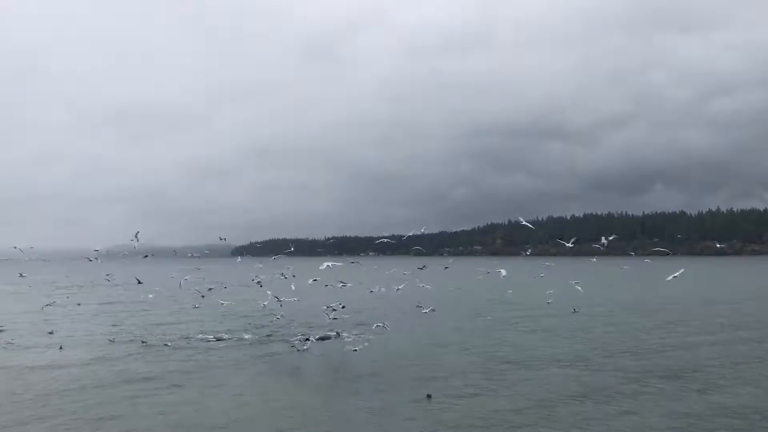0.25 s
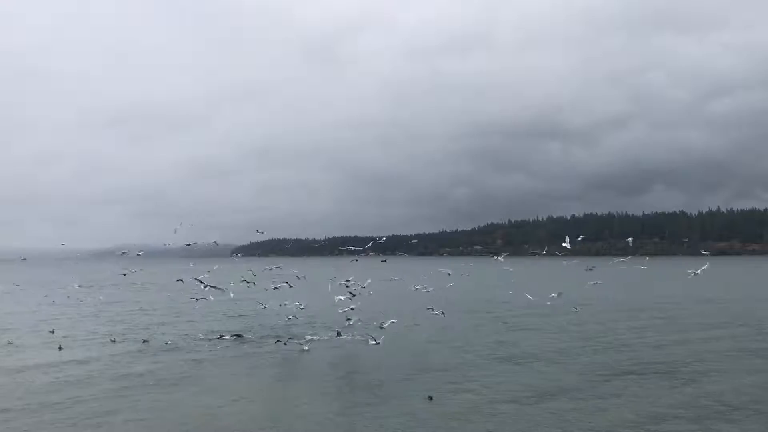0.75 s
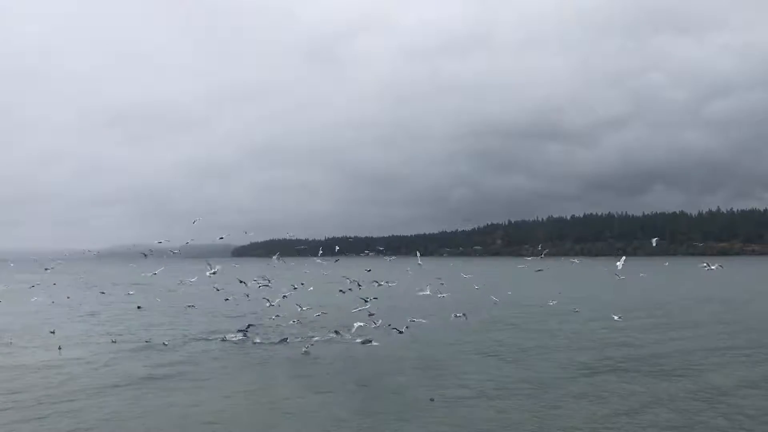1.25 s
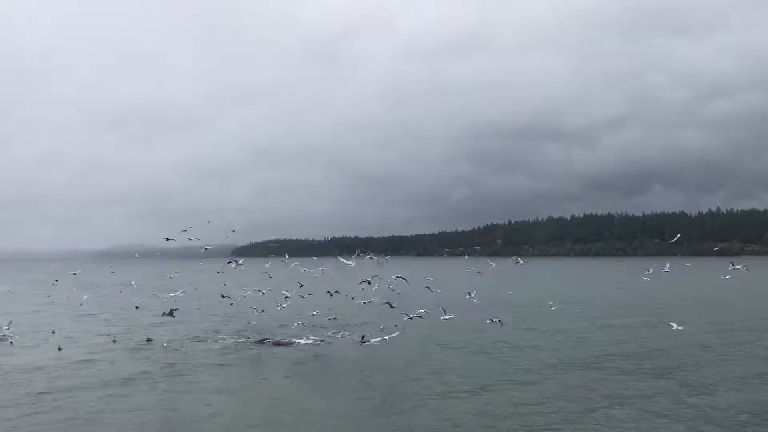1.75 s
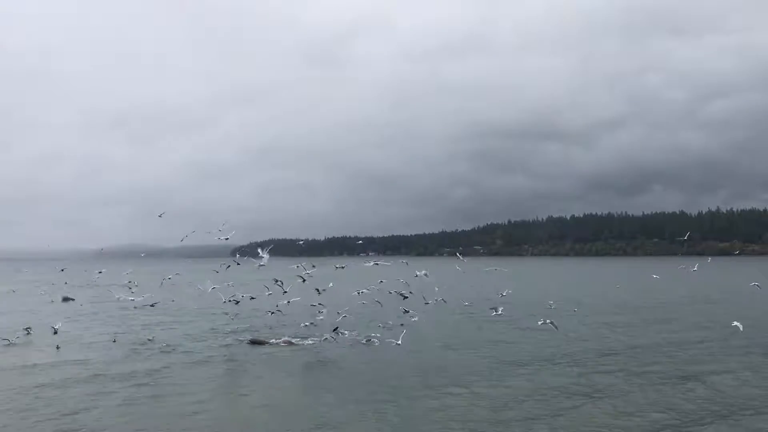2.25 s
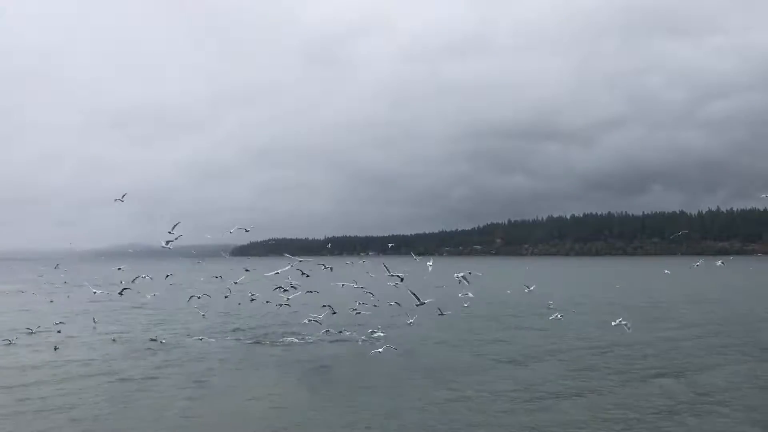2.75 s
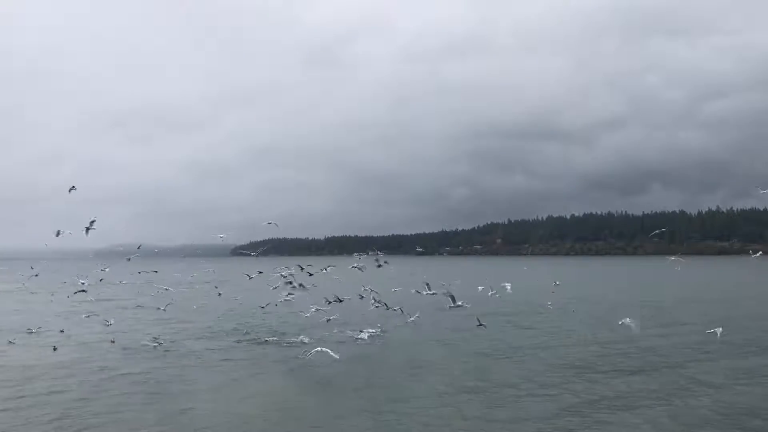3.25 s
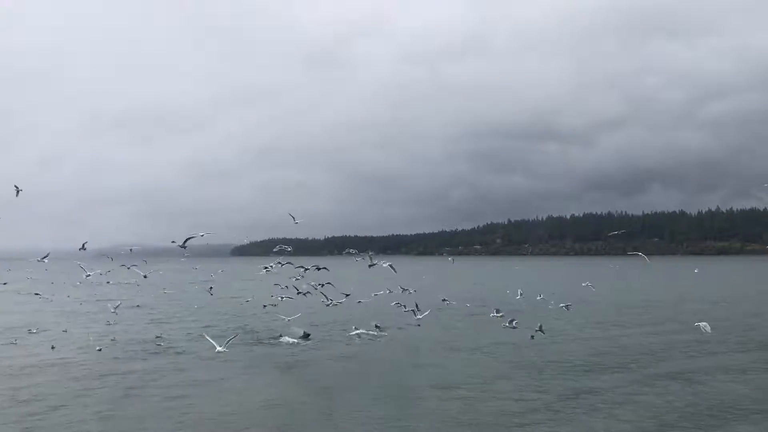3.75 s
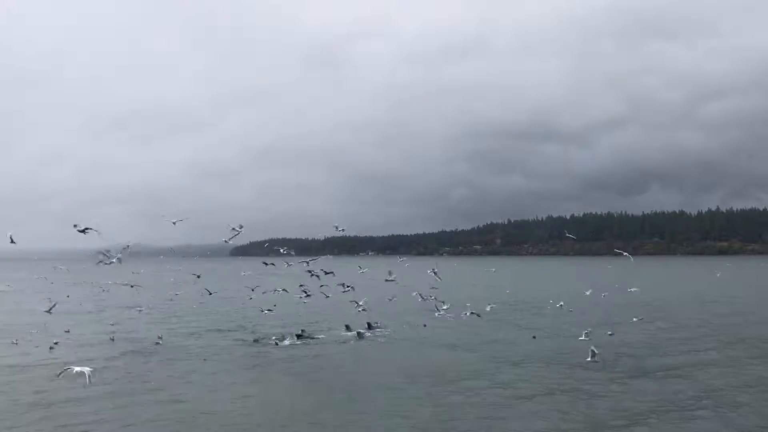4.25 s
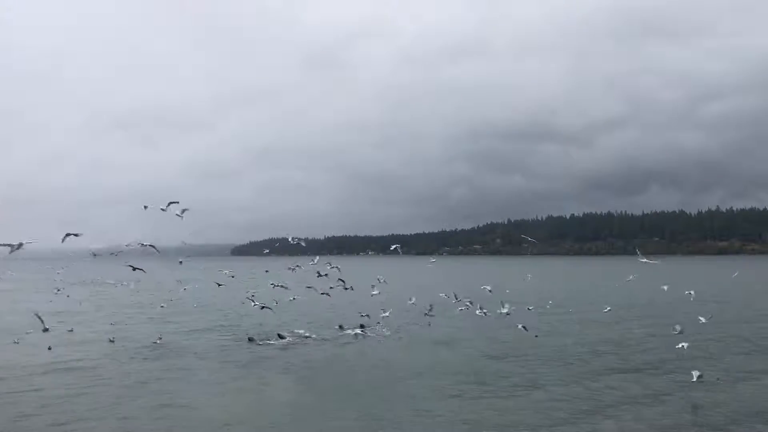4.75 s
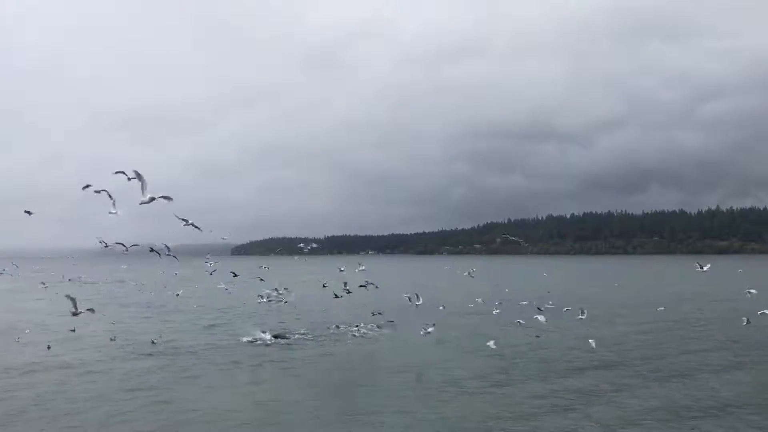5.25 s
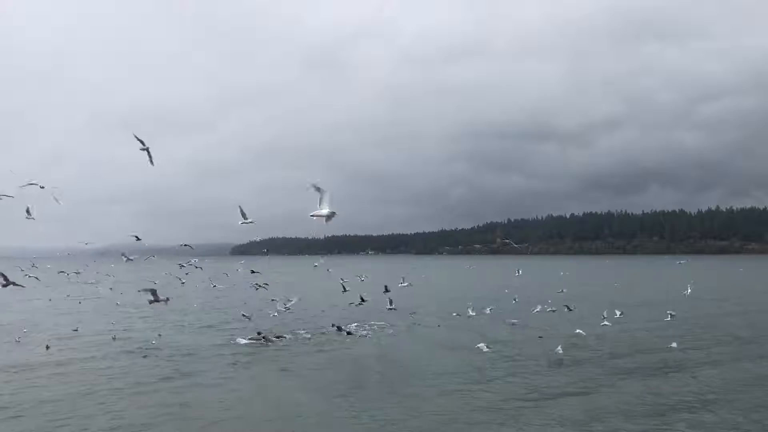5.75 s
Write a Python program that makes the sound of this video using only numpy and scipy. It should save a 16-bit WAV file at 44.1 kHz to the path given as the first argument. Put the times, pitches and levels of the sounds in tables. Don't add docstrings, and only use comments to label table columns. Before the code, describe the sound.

Dozens of gulls chirp, yelp and squawk above soft wash, with low irregular wind thumps, the hardest around four and a half seconds.

```python
import sys
import numpy as np
from scipy import signal
from scipy.io import wavfile
from scipy.ndimage import uniform_filter1d

SR = 44100
rng = np.random.default_rng(int(sys.argv[2]) if len(sys.argv) > 2 else 0)


def master(y):
    cut = np.clip(np.atleast_2d(y).T, -1, 1)
    pcm = np.round(cut * 32767)
    wavfile.write(sys.argv[1], SR, pcm.astype(np.int16))


def gain_from_decibels(decibels):
    exponent = np.asarray(decibels, float) / 20
    return 10 ** exponent


N = 265041

# multiple, level_db
BRIGHT_VOICE = [(1, 1), (2, -19.5), (3, -35)]


def in_time(rows):
    s, *columns = np.transpose(rows)
    return [np.interp(np.arange(N) / SR, s, c) for c in columns]


def rms_one(x):
    return x / np.sqrt(np.mean(x ** 2) + 1e-20)


def band(x, low_hz, high_hz):
    return signal.sosfilt(signal.butter(2, [low_hz, high_hz], "band", fs=SR, output="sos"), x)


def drift(rate_hz):
    r = np.exp(-40 * np.pi * rate_hz / SR)
    slow = signal.lfilter([1], [1, -2 * r, r * r], rng.standard_normal(N // 20 + 4002))[4000:]
    return np.interp(np.arange(N) / 20, np.arange(len(slow)), rms_one(slow))


def cries(rows, voice, waver=0.0055, flutter_db=1.6, bend=0, warble_per_s=0):
    out = np.zeros(N)
    wobble = drift(42.25)
    flutter = drift(19.6) + 1.138 * drift(109)
    for (s, length_s, start_hz, end_hz, level_db), bow in zip(rows, np.broadcast_to(bend, len(rows))):
        at = np.arange(max(round(s * SR), 0), min(round((s + length_s) * SR), N))
        u = np.linspace(0, 1, len(at))
        arc = np.sin(np.pi * u * max(1, 2 * warble_per_s * length_s))
        pitch_hz = (start_hz + (end_hz - start_hz) * u) * (1 + bow * arc)
        own = at + rng.integers(N)
        phase = 2 * np.pi * np.cumsum(pitch_hz * (1 + waver * wobble[own % N])) / SR
        fade = np.minimum(1, np.minimum(u / 0.0137, (1 - u) / 0.0176) * length_s)
        breath = np.sin(np.pi / 2 * fade) ** 2 * gain_from_decibels(level_db - 0.5 - 6.7 * (u - .45) ** 2)
        for k, (multiple, partial_db) in enumerate(voice):
            air_db = -.3 * max(multiple * pitch_hz[0] / 1000 - 5, 0)
            if multiple * pitch_hz.max() < 16000:
                unsteady = gain_from_decibels(partial_db + air_db + flutter_db * flutter[(own + SR * k) % N])
                out[at] += np.sqrt(2) * breath * unsteady * np.sin(multiple * phase)
    return out


def squeals():
    # start_s, length_s, start_hz, end_hz, level_db; sliding cries mostly fall, some rise or hold
    sliding = [(.426, 0.0422, 2845, 2681, -35.5), (.511, 0.0272, 2764, 2360, -30),
               (.852, 0.134, 1869, 1657, -43), (1.152, 0.141, 4483, 4065, -47),
               (1.46, 0.096, 3050, 2736, -38), (2.124, 0.085, 3245, 3181, -36),
               (2.383, 0.125, 3660, 3562, -40), (2.641, 0.0955, 2536, 2440, -37),
               (2.685, 0.0925, 2490, 2365, -40.5), (2.844, 0.122, 2951, 2620, -42),
               (2.911, 0.098, 1826, 1562, -42), (3.074, 0.092, 1643, 1564, -35.5),
               (3.875, 0.075, 3060, 2950, -42), (3.93, .035, 2960, 2860, -35),
               (4.845, 0.1127, 3820, 3533, -43), (5.358, 0.1055, 4373, 4260, -42),
               (5.445, 0.0425, 3680, 3450, -40.5), (5.5, 0.0546, 3407, 3272, -36.5),
               (.055, 0.122, 2825, 2862, -43), (0.115, 0.113, 2905, 2874, -35),
              (0.156, 0.0567, 3458, 3545, -34.5), (1.358, 0.115, 2704, 2967, -45),
              (2.348, .032, 3230, 3120, -39), (2.993, 0.095, 1647, 1622, -37.5),
              (3.26, 0.0377, 2430, 2836, -35), (3.287, 0.041, 3536, 3670, -37)]
    arched = [(1.663, 0.0452, 2940, 2800, -40), (2.62, 0.0291, 3230, 3150, -29.5),
              (3.544, 0.0608, 3800, 3640, -44.5), (4.86, .075, 4330, 4150, -48.5),
              (3.152, 0.103, 1630, 1440, -36)]
    dipped = [(.447, 0.0473, 2770, 2842, -35.5), (.604, 0.079, 3425, 3367, -39),
              (.604, 0.04, 1327, 1384, -38), (.691, 0.2224, 3725, 3744, -47),
              (1.527, .075, 3247, 3130, -41), (3.494, 0.042, 2730, 2343, -41),
              (4.534, 0.0675, 1273, 1250, -40.5)]
    settling = [
        (1.52, 0.285, 3505, 3190, -44),
        (3.985, 0.238, 3410, 3125, -33.5),
    ]
    out = cries(sliding, BRIGHT_VOICE)
    out = out + cries(arched, BRIGHT_VOICE, bend=0.0384)
    out = out + cries(dipped, BRIGHT_VOICE, bend=-0.0392)
    return out + cries(settling, BRIGHT_VOICE, bend=-.017)


def yelps():
    # start_s, length_s, start_hz, end_hz, level_db; yelps fall, rise or hold, yaps are mostly steeper
    short_yelps = [(-0.006, 0.0596, 2930.0, 2756, -45.5), (0.058, 0.0307, 3850.0, 3750, -41.5),
                   (.072, .092, 1586, 1281, -48), (0.064, 0.0766, 3060.0, 2954, -37),
                   (0.284, 0.05, 2550.0, 2473, -45), (0.554, 0.0606, 2520.0, 2692, -43.0),
                   (1.21, .07, 1640, 1420, -48), (0.676, 0.07, 3120.0, 2836, -43.5),
                   (0.694, 0.029, 2400.0, 2360, -38.5), (0.778, 0.0556, 1440.0, 1512, -43.5),
                   (0.85, 0.035, 3770.0, 3758, -41), (1.279, .06, 2662, 2863, -46),
                   (2.097, .04, 4157, 4150, -47), (2.2, .145, 2530, 2480, -47),
                   (1.048, 0.04, 3030.0, 3075, -37.0), (1.109, 0.044, 4330.0, 4140, -44.5),
                   (1.126, 0.0395, 2810.0, 2780, -40.5), (1.265, 0.052, 3550.0, 3467, -44.0),
                   (1.431, 0.025, 3350.0, 3230.0, -39), (1.518, 0.0665, 3500.0, 3408, -37.5),
                   (1.587, 0.0344, 3810.0, 3805, -42), (1.889, 0.046, 3200.0, 3195, -44.5),
                   (2.095, 0.0356, 2530.0, 2500.0, -42.5), (2.296, 0.115, 4420.0, 4430, -50.5),
                   (2.316, 0.069, 3590.0, 3523, -42), (2.333, 0.06, 1800.0, 1694, -42),
                   (2.432, 0.0565, 1000.0, 1069, -41.5), (2.531, 0.0324, 3720.0, 3628, -32),
                   (2.534, 0.079, 3450.0, 3530, -39.5),
                   (2.763, 0.099, 2420.0, 2384, -41.5), (2.773, 0.0363, 3720.0, 3500, -34.5),
                  (2.82, 0.049, 3350.0, 3290, -44.5), (2.849, 0.143, 1950.0, 1870, -44.5),
                  (2.905, 0.06, 3980.0, 4014, -47), (2.995, 0.05, 2590.0, 2574, -40),
                  (2.999, 0.0913, 3620.0, 3685, -42.5), (3.059, 0.042, 2680.0, 2515, -43),
                  (3.093, 0.035, 3280.0, 3270.0, -47), (3.263, 0.056, 4250.0, 4485, -45.5),
                  (3.346, 0.032, 2480.0, 2625, -30.5), (3.474, 0.035, 2520.0, 2730, -39),
                  (3.49, 0.0555, 1410.0, 1391, -42.5), (3.544, 0.034, 2510.0, 2590, -40.5),
                  (3.765, 0.085, 3560.0, 3505, -50.5), (3.82, 0.066, 2430.0, 2268, -42.5),
                  (3.932, 0.082, 4340.0, 4278, -48.5), (4.083, 0.058, 4280.0, 4380, -47.5),
                  (4.141, .07, 4265, 4330, -51), (4.196, .064, 4131, 3963, -47),
                  (3.137, .056, 2691, 2508, -47), (5.276, .078, 3094, 2918, -51),
                  (4.972, .028, 3090, 2990, -44), (4.247, 0.0545, 4620.0, 4590.0, -47.5),
                  (4.272, 0.06, 2470.0, 2500, -44.0), (4.545, 0.052, 3590.0, 3600.0, -45.5),
                  (4.699, 0.0344, 3230.0, 3180, -30), (4.731, 0.031, 3170.0, 3400.0, -42),
                  (4.958, 0.0432, 3320.0, 3550, -43), (5.447, 0.032, 2410.0, 2549, -35.0),
                  (5.604, 0.0715, 1300.0, 1414, -44), (5.735, 0.091, 1510.0, 1353, -42)]
    yaps = [(0.59, 0.029, 2420, 2220, -41), (0.653, .032, 2468, 2194, -38), (.675, 0.036, 3872, 3898, -39),
            (1.01, 0.0484, 3610, 3497, -43), (1.066, 0.042, 2105, 1950, -43.5),
            (1.068, 0.056, 4700, 4950, -50.5), (2.61, 0.031, 3720, 3330, -35.5),
            (2.64, 0.031, 2414, 2140, -39.5), (2.771, .075, 2145, 2020, -47),
            (2.901, 0.076, 1401, 1371, -43.5), (2.92, 0.061, 3700, 3380, -45.5),
            (2.999, .06, 1321, 1272, -44), (3.001, 0.0647, 2050, 1892, -43.5)]
    return cries(short_yelps + yaps, BRIGHT_VOICE)


def open_billed_cries():
    # start_s, length_s, start_hz, end_hz, level_db
    rich_cries = [(.366, 0.055, 2035, 1837, -31.5), (.667, 0.0847, 1560, 1355, -42.5),
                  (1.066, 0.0994, 1530, 1328, -32.5), (1.059, 0.062, 1674, 1539, -37),
                  (2.125, 0.055, 2090, 2060, -43.5), (2.563, 0.0402, 1610, 1295, -43),
                  (2.583, 0.064, 2710, 2480, -39.5), (2.624, 0.03, 2590, 2590, -37),
                  (3.248, 0.0394, 2050, 2075, -37.5), (3.602, 0.13, 2980, 2710, -47.5),
                  (4.194, 0.079, 3740, 3403, -38.5), (4.742, 0.132, 4620, 4475, -47.5)]
    # multiple, level_db
    rich_voice = [(1, 2), (2, -15), (3, -23)]
    return cries(rich_cries, rich_voice)


def low_cries():
    # start_s, length_s, start_hz, end_hz, level_db
    deep_cries = [(.049, 0.077, 1955, 1748, -46), (.09, 0.0746, 1795, 1670, -44),
                  (.18, 0.049, 1672, 1623, -45), (.328, 0.0617, 1320, 1087, -45.5),
                  (.66, 0.038, 1405, 1233, -37), (1.071, 0.0557, 1629, 1568, -41),
                  (1.117, 0.11, 1826, 1607, -43.5), (2.037, 0.19, 1773, 1635, -48.5),
                  (2.473, .048, 1690, 1610, -37), (2.551, 0.074, 1429, 1495, -43.5),
                  (2.699, 0.0344, 1338, 1400, -38.5), (2.894, 0.052, 1534, 1361, -42.5),
                  (3.11, .06, 1750, 1700, -47), (5.352, 0.0213, 1440, 1601, -35.5)]
    nasal_cries = [(.478, 0.0852, 1741, 1699, -42), (.987, 0.096, 1281, 1275, -47.5),
                   (1.373, 0.0632, 1718, 1642, -36), (1.508, .034, 1870, 1905, -45),
                   (2.366, .05, 1410, 1350, -39), (2.41, .055, 1390, 1410, -41),
                   (2.502, 0.06, 1335, 1429, -37), (4.652, 0.095, 1649, 1593, -40.5)]
    # multiple, level_db
    deep_voice = [(1, -0.5), (2, 5), (3, -12.5), (4, -20)]
    nasal_voice = [(1, -21.5), (2, 3.5), (3, -15.5), (4, -16.5), (5, -32)]
    return cries(deep_cries, deep_voice) + cries(nasal_cries, nasal_voice)


def whistles():
    # start_s, length_s, start_hz, end_hz, level_db; the 4500 Hz row is the third partial of the 1598 Hz
    bare_whistles = [(.203, 0.137, 1559, 1500, -46), (.215, 0.0925, 2884, 2761, -37.5),
                     (.604, 0.08, 3938, 3790, -47), (.955, 0.0577, 3854, 3978, -40),
                     (1.245, 0.1116, 5630, 5715, -48.5), (1.318, 0.0874, 3369, 3248, -41.5),
                     (1.54, 0.126, 2830, 2858, -45), (3.94, 0.0584, 3652, 3885, -40),
                     (2.394, 0.12, 1500, 1488, -41.5), (2.621, 0.0767, 2926, 2797, -38),
                     (3.497, 0.0426, 3934, 3822, -44.5), (3.57, 0.0423, 2592, 2210, -36.5),
                     (.208, 0.11, 4167, 3867, -43.5), (2.77, 0.1096, 4299, 3994, -33.5),
                     (4.275, 0.1135, 3508, 3428, -43), (4.63, 0.147, 2100, 2200, -50),
                     (4.69, 0.105, 3998, 3652, -44), (4.844, 0.099, 3277, 3585, -45.5),
                     (4.905, 0.0306, 2222, 1950, -41), (1.862, 0.0374, 3240, 3176, -44),
                     (5.802, 0.162, 1598, 1462, -44), (5.795, .175, 4500, 4120, -51),
                     (2.43, 0.0587, 4465, 4205, -39.5), (2.49, 0.0653, 4161, 4240, -35.5)]
    chirps = [
        (0.583, 0.0336, 4785, 4498, -42.5),
        (4.485, 0.0453, 3595, 3380, -43.5),
        (4.49, 0.0364, 1605, 1544, -38.5),
        (4.954, 0.0327, 1802, 2050, -44.5),
        (5.037, 0.0413, 2356, 2577, -44.5),
    ]
    piping = [(.515, 0.048, 5250, 4820, -48), (.76, 0.058, 7290, 7340, -61), (.923, 0.065, 7270, 7440, -54),
              (.943, .058, 5210, 5310, -51), (1.187, 0.083, 8770, 8410, -57.5),
              (2.452, 0.047, 8630, 8620, -53.5), (2.61, 0.0405, 5132, 5224, -43),
              (2.656, 0.039, 4890, 5050, -48), (2.74, 0.133, 5215, 5350, -50.5),
              (2.812, 0.113, 11600, 11300, -64), (2.853, 0.0603, 4990, 4690, -52),
              (3.004, 0.135, 6540, 6570, -59.5), (3.703, 0.0287, 5150, 5310, -45),
              (5.425, 0.043, 8470, 8480, -56), (5.517, 0.0314, 5830, 5800, -49),
              (.606, 0.156, 11820, 10990, -70.5)]
    # multiple, level_db
    plain_voice = [(1, 0.5)]
    return cries(bare_whistles + chirps, plain_voice) + cries(piping, plain_voice)


def odd_voices():
    # multiple, level_db
    warbles = [
        (3.328, .14, 2587, 2317, -34),
        (3.612, 0.138, 2568, 2615, -41),
    ]
    warble_voice = [(.5, -17), (1, -1.5), (2, -16), (4, -34.5)]
    shrill = [
        (.085, 0.072, 1590, 1320, -50),
        (2.85, .17, 975.5, 944, -46.5),
    ]
    shrill_voice = [(2, -2), (3, 0), (4, -1), (5, -9), (6, -10), (7, -12), (8, -15), (9, -17), (10, -19)]
    strident = [
        (5.375, 0.1196, 2366, 2628, -37.5),
    ]
    strident_voice = [(1, 0), (2, -9.5), (3, -26), (4, -26.5), (5, -21)]
    reedy = [
        (4.2, .09, 3105, 3090, -43),
        (4.278, .172, 3090, 2700, -45),
    ]
    reedy_voice = [(1, 2.5), (2, -2.5), (4, -19.5)]
    drooping = [
        (5.535, .085, 2575, 2308, -39.5),
    ]
    drooping_voice = [(1, 0.5), (2, -7), (2.5, -19.5)]
    out = cries(warbles, warble_voice, waver=0.00157, flutter_db=2.5, bend=-.045, warble_per_s=14.5)
    out = out + cries(shrill[:1], shrill_voice)
    out = out + cries(shrill[1:], shrill_voice[:6])
    out = out + cries(strident, strident_voice, bend=-0.0392)
    out = out + cries(reedy, reedy_voice)
    return out + cries(drooping, drooping_voice, bend=-0.0392)


def squawks():
    # start_s, length_s, pulses_per_s, level_db
    bursts = [(1.056, 0.096, 280, -50.5), (2.209, 0.28, 290, -50.5), (2.502, 0.041, 290, -53.5),
              (2.597, 0.04, 300, -46.5), (2.69, 0.054, 360, -47), (3.262, .05, 330, -51)]
    # centre_hz, width_hz, level_db
    throat = [(1500, 370, -10), (2770, 715, 3.5), (4107, 850, 0.5), (6700, 2600, -13)]
    pulses, out = 1e-9 * rng.standard_normal(N), 0
    for s, length_s, per_s, level_db in bursts:
        gap, size = rng.standard_normal((2, 60))
        after_s = np.cumsum((1 + 0.07 * gap) / per_s)
        inside = after_s < length_s
        swell = np.sqrt(np.sin(np.pi * (after_s[inside] / length_s) ** 0.98))
        at = ((s + after_s[inside]) * SR).astype(int)
        pulses[at] = gain_from_decibels(level_db + 41.0 + 1.17 * size[inside]) * swell
    for hz, width_hz, db in throat:
        driven = band(pulses, hz / 1.3, hz * 0.98)
        out = out + gain_from_decibels(db) * band(driven, hz - width_hz / 2, hz + width_hz / 2)
    return out


def far_flock():
    # start_s, level_db
    clamour = [(0, -51), (.15, -42.5), (.86, -42.5), (1.04, -37.5), (1.58, -43), (1.82, -49), (2.46, -33),
               (2.88, -40.5), (4.05, -40), (5.1, -48.5), (5.25, -46.5), (5.55, -52), (5.72, -42.5),
               (6.01, -45.5)]
    # multiple, level_db
    far_voice = [(.5, -16.5), (1, 3.5), (2, -12), (3, -21)]
    flock_db, = in_time(clamour)
    start, length, height, arch, fall, loud = rng.random((800, 6)).T
    start_hz = 1500 * 2 ** (1.35 * height)
    end_hz = start_hz * (1 - .15 * (fall - .2))
    rows = np.c_[start * N / SR, .025 + .11 * length ** 3, start_hz, end_hz, -11 * loud]
    murmur = cries(rows, far_voice, waver=0.0079, flutter_db=3.0, bend=0.07 * (arch - .4))
    return gain_from_decibels(flock_db - 5.0) * rms_one(murmur)


def over_water(x):
    echo = signal.lfilter([.4], [1, -.6], x)
    out = x
    for delay_s, db in [(.007, -13), (.021, -18), (.043, -23)]:
        out = out + np.r_[np.zeros(round(delay_s * SR)), echo][:N] * gain_from_decibels(db)
    return out


def gusts():
    # start_s, rumble_db
    breeze = [(0, -30), (.7, -36.5), (1.0, -36.5), (1.6, -37), (2.1, -26), (2.55, -37), (3.1, -38.5),
              (3.6, -42), (4.4, -44.5), (5.2, -63), (6.01, -50.5)]
    # peak_s, peak_db, sink_s (time to sink by 18.5 dB)
    gust_peaks = [(.02, -31, 0.32), (.25, -30.5, 0.1455), (.63, -31, 0.35), (.76, -27.5, 0.04),
                  (1.08, -25.5, 0.0928), (1.71, -32, 0.15), (1.87, -26.5, 0.0637), (2.18, -25, 0.0882),
                  (2.38, -23.5, 0.1336), (3.11, -31.5, 0.1564), (3.31, -30.5, 0.1216),
                  (3.51, -29.5, 0.0546), (3.93, -35, 0.31), (4.48, -34, 0.416), (4.618, -17.5, 0.0516),
                  (4.725, -22, 0.0618), (4.872, -27.5, 0.04), (4.981, -24.5, 0.0773), (5.3, -38, 0.48),
                  (5.411, -25, 0.0767), (5.5, -25, 0.0881), (5.72, -37, 0.15), (5.85, -28, 0.08),
                  (6.0, -27, 0.0223)]
    power, t = gain_from_decibels(2 * in_time(breeze)[0]), np.arange(N) / SR
    for s, peak_db, sink_s in gust_peaks:
        power = power + gain_from_decibels(2 * (peak_db - 18.5 * (np.abs(t - s) / sink_s) ** 1.727))
    return 10 * np.log10(power)


def wind():
    # start_s, peak_db
    buffets = [(1.118, -20), (1.871, -20.5), (2.368, -16.5), (3.248, -11), (3.316, -12.5), (4.548, -13),
               (4.578, -6), (4.601, -4), (4.708, -8), (4.863, -30.5), (4.979, -26.5), (5.492, -13.5),
               (5.515, -16), (5.843, -12)]
    gust_db = gusts()
    white = rng.standard_normal((3, N))
    rumble = band(band(white[0], 36, 89.37), 38, 216)
    rumble = rms_one(rumble / uniform_filter1d(rumble ** 2, size=2400) ** 0.349)
    flutter = rms_one(band(white[1], 92.6, 272.4) * gain_from_decibels(2.0 * drift(17.3)))

    push, after_s = np.zeros(N), np.arange(round(.12 * SR)) / SR
    rise_s = 0.00776
    for s, peak_db in buffets:
        at = round(s * SR)
        push[at:at + len(after_s)] += gain_from_decibels(peak_db) * after_s / rise_s * np.exp(1 - after_s / rise_s)
    eddy = signal.lfilter([1], [1, -.96], band(white[2], 93, 300.6))
    eddy = rms_one(eddy / uniform_filter1d(eddy ** 2, size=900) ** 0.05)
    hiss = rms_one(band(white[1], 359, 827))

    steady = gain_from_decibels(gust_db + 1.59) * rumble + gain_from_decibels(-40 + 0.7 * (gust_db + 31)) * flutter
    return steady + gain_from_decibels(-6.5) * push * eddy + gain_from_decibels(-21) * push ** 2 * hiss


def snaps():
    # start_s, peak_db
    snap_rows = [(1.883, -29), (2.347, -28.5), (3.255, -28), (3.321, -24), (4.549, -22.5), (4.579, -14.5),
                 (4.597, -7), (4.716, -21), (5.468, -31), (5.51, -24.5), (5.847, -25.5)]
    out, after_s = np.zeros(N + SR), np.arange(round(.05 * SR)) / SR
    pitch_hz = 150 + 657 * np.exp(-after_s / 0.00782)
    phase = 2 * np.pi * np.cumsum(pitch_hz) / SR
    whoop = np.sin(phase) * np.exp(-after_s / 0.00429) * np.minimum(1, after_s / 0.00152)
    for s, peak_db in snap_rows:
        at = round((s + 0.001992) * SR)
        out[at:at + len(after_s)] += gain_from_decibels(peak_db + 0.5) * whoop * rng.choice([-1, 1])
    return out[:N]


def drops():
    # start_s, peak_db
    drop_rows = [
        (.0002, -24),
        (1.8984, -43.5),
        (1.8997, -36),
        (5.7083, -41.5),
    ]
    click = 1e-9 * rng.standard_normal(N)
    for s, peak_db in drop_rows:
        click[round(s * SR)] = gain_from_decibels(peak_db + 7)
    return band(click, 6700, 15500)


def patchy_noise(spectrum, patchy_db):
    hz, level_db = np.transpose(spectrum)
    out, white, together = 0, rng.standard_normal((2, N)), drift(12.8)
    top_hz = min(hz[-2] * 1.4, 20000)
    edges_hz = hz[1] * 2 ** np.arange(-2 / 3, np.log2(top_hz / hz[1]), 1 / 3)
    for k, (low_hz, high_hz) in enumerate(zip(edges_hz, edges_hz[1:])):
        centre_db = np.interp(np.log(low_hz * high_hz) / 2, np.log(hz), level_db)
        flicker_db = patchy_db * (0.3 * together + drift(17.6))
        out = out + gain_from_decibels(centre_db + flicker_db) * band(white[k % 2], low_hz, high_hz)
    return rms_one(out)


def sea():
    # start_s, spray_db
    swell = [(0, -60.5), (.15, -63.5), (.86, -66.5), (1.04, -57), (1.58, -65.5), (2.46, -65.5), (2.88, -60),
             (3.14, -65.5), (4.05, -59.5), (4.22, -55), (4.56, -66), (5.1, -67), (5.25, -59.5), (5.5, -67),
             (5.72, -55.5), (6.01, -63.5)]
    # pitch_hz, level_db (per Hz)
    wash_spectrum = [(200, -17.5), (300, -8.5), (480, -9), (600, -5), (1230, -6), (2800, -16),
                     (5000, -22.5), (9000, -35.5), (12000, -56.5)]
    spray_spectrum = [(3000, -50), (5000, -4.5), (7700, -5.5), (9700, -6), (15700, -12.5), (17000, -11)]
    spray_db, = in_time(swell)
    wash_db = -41 + 0.418 * (spray_db - spray_db.mean())
    wash = gain_from_decibels(wash_db) * patchy_noise(wash_spectrum, patchy_db=1.9)
    return wash + gain_from_decibels(spray_db - 1) * patchy_noise(spray_spectrum, patchy_db=2.2)


def scene():
    gulls = squeals() + yelps() + open_billed_cries() + low_cries() + whistles() + odd_voices()
    gulls = gulls + squawks() + far_flock()
    around = wind() + snaps() + drops() + sea()
    return (over_water(gulls) + around)[None]


def low_pass(x):
    return signal.sosfilt(signal.butter(12, 16530, fs=SR, output="sos"), x)


def record(dry):
    rounded = .8 * np.tanh(dry / .8)
    cut = signal.sosfilt(signal.ellip(10, .5, 70, 15650, fs=SR, output="sos"), rounded)
    return low_pass(cut)


dry = scene()
out = record(dry)
master(out)
```